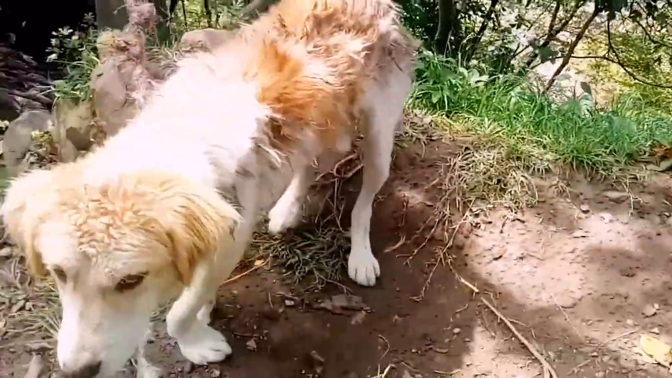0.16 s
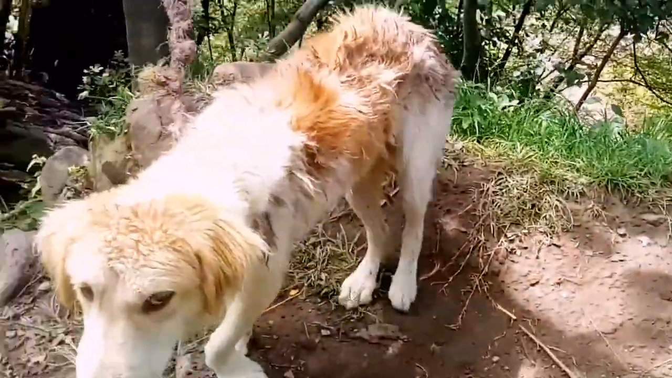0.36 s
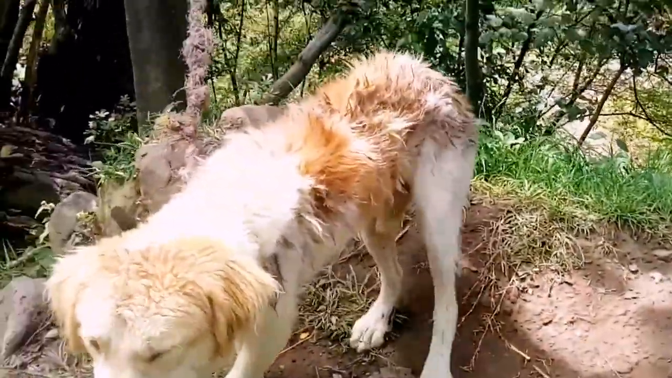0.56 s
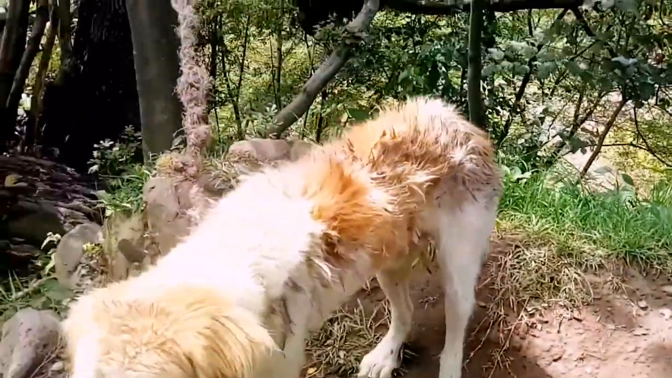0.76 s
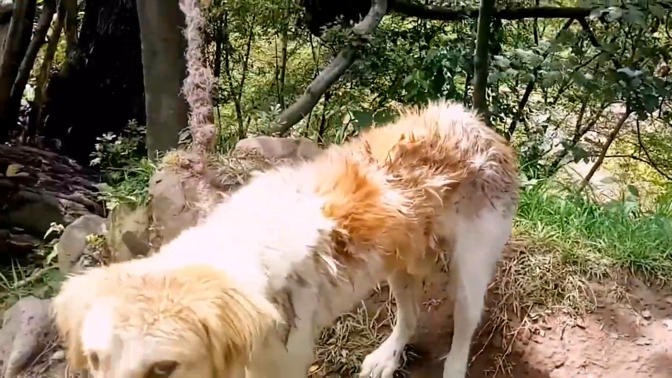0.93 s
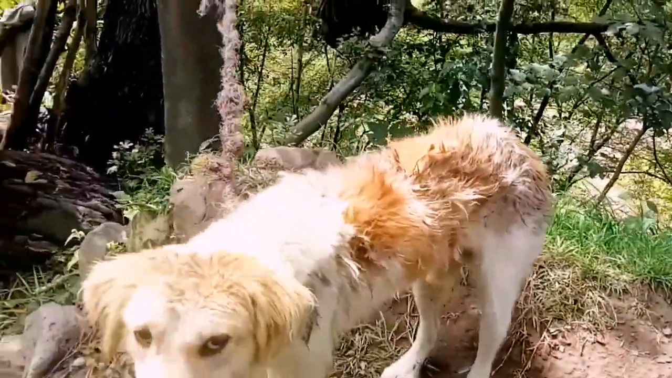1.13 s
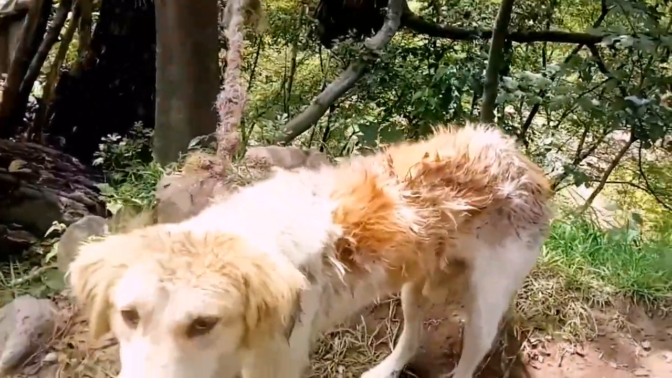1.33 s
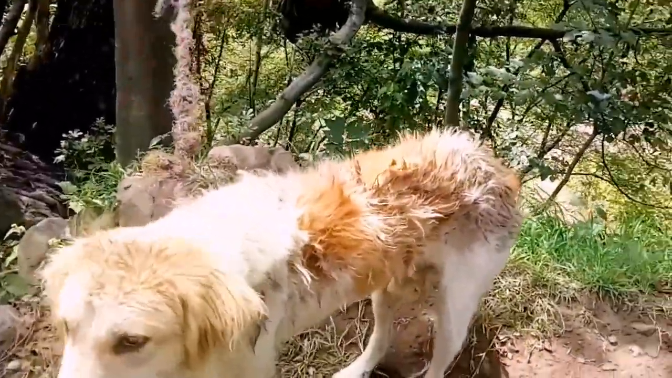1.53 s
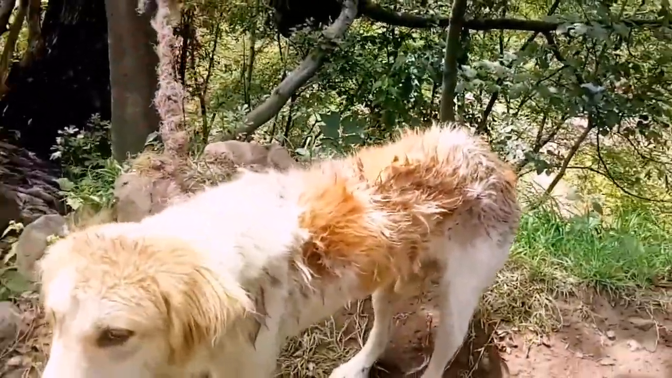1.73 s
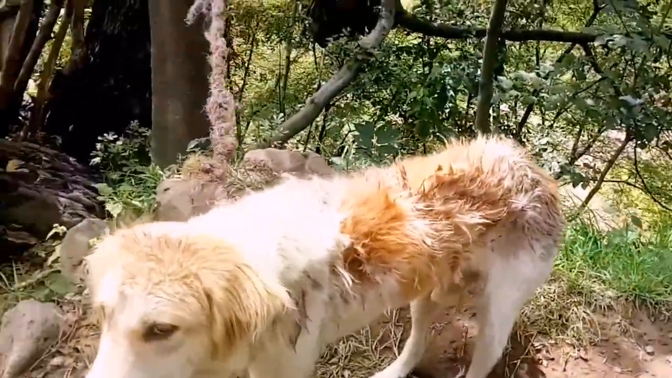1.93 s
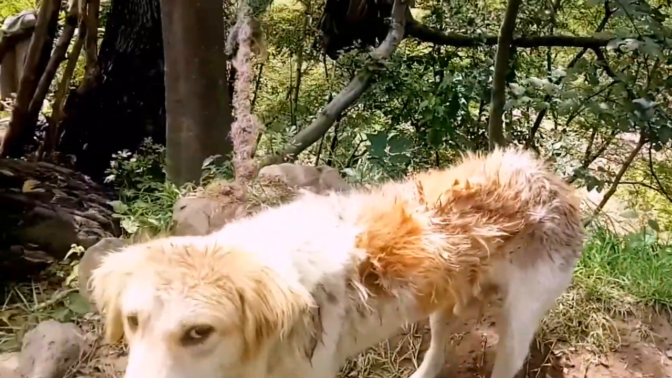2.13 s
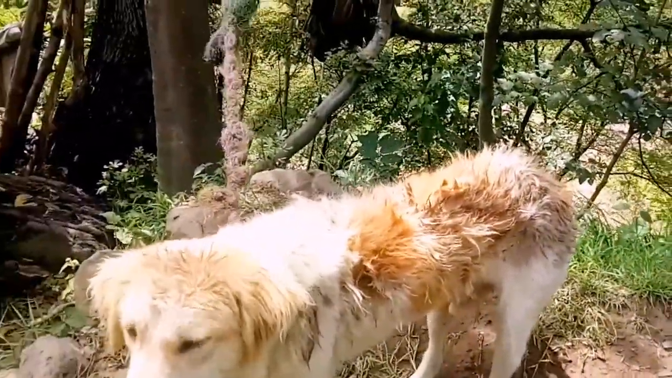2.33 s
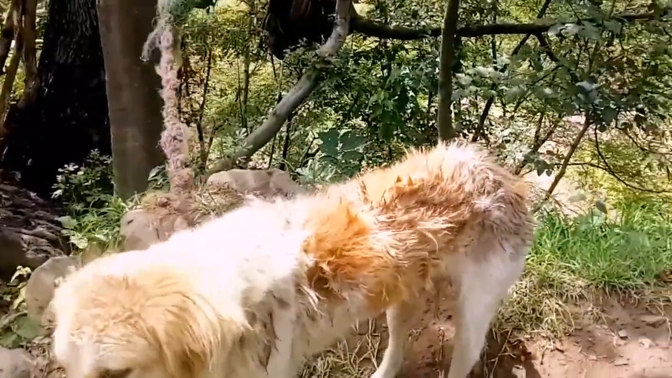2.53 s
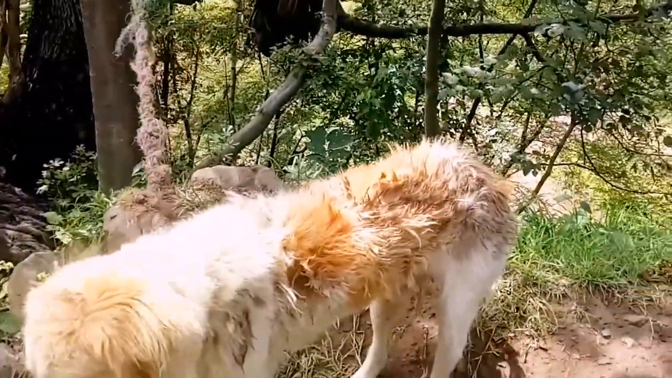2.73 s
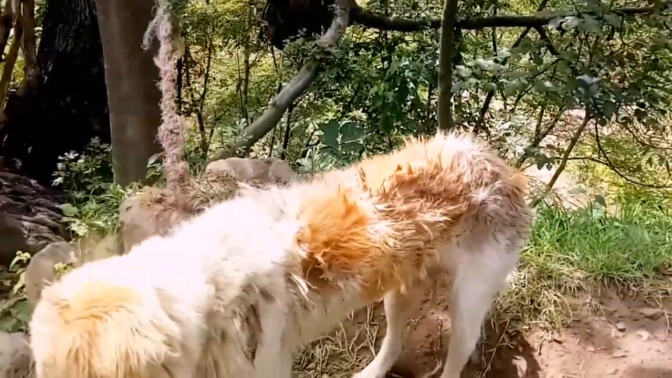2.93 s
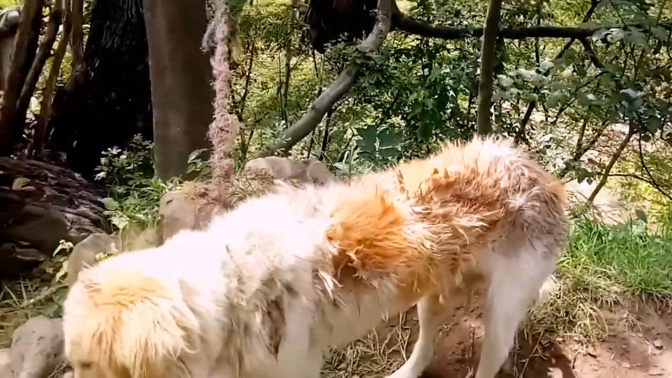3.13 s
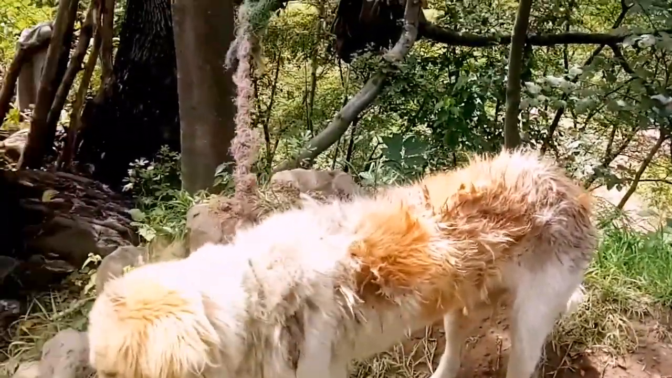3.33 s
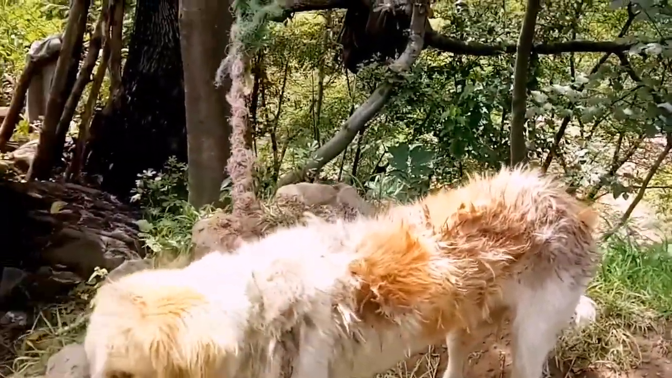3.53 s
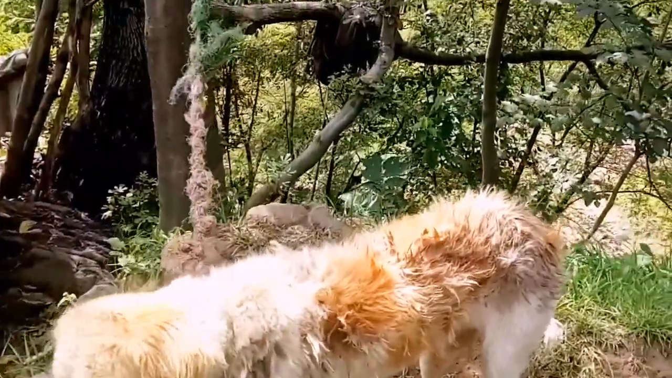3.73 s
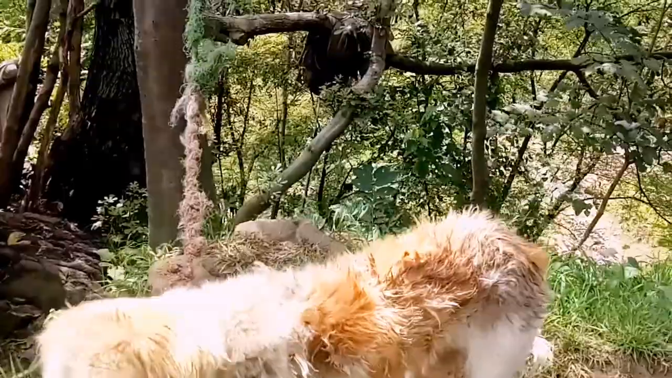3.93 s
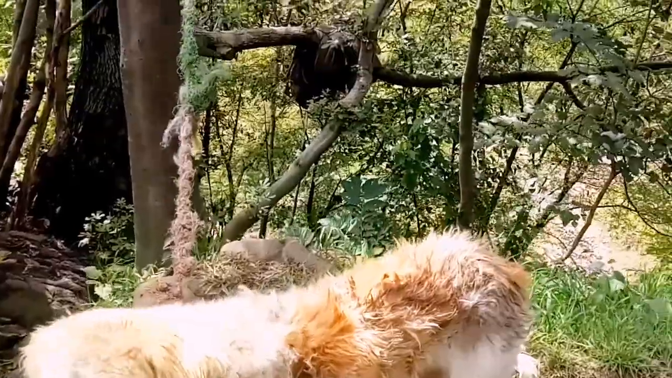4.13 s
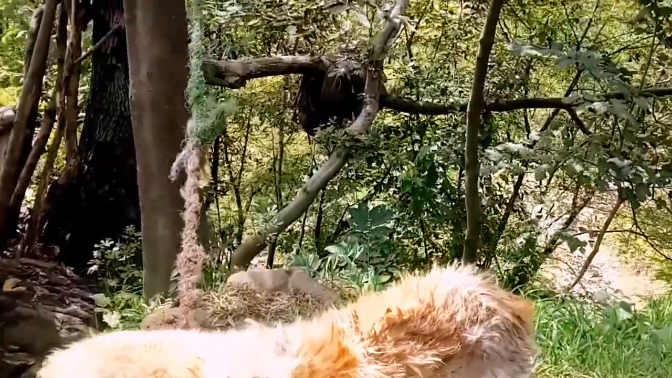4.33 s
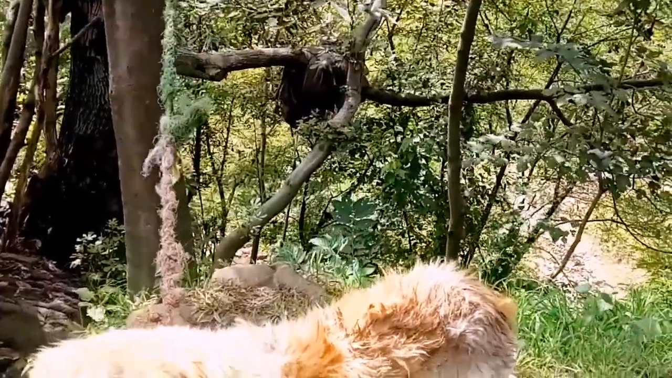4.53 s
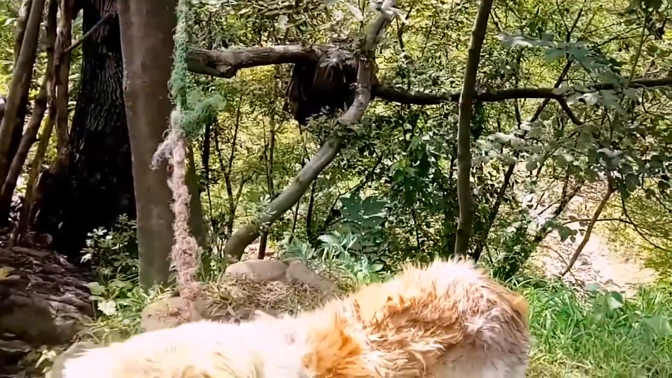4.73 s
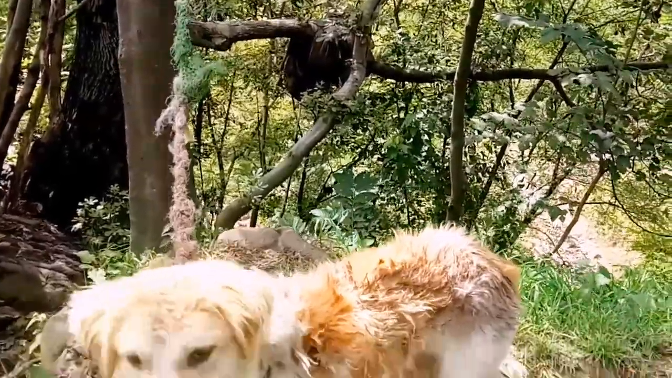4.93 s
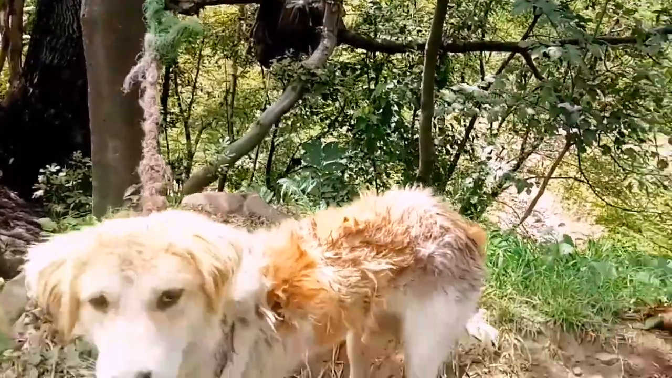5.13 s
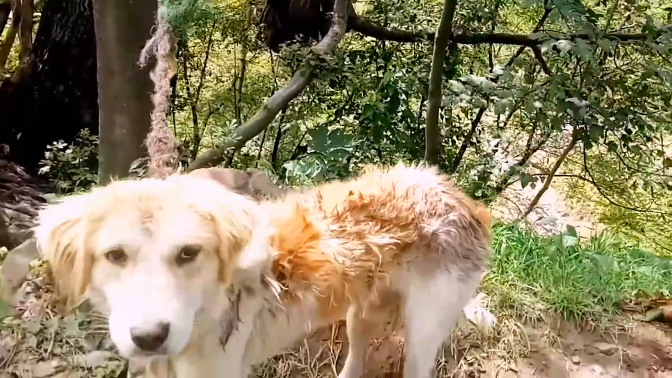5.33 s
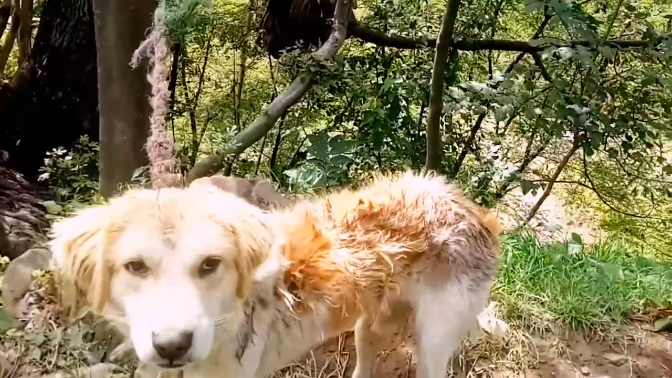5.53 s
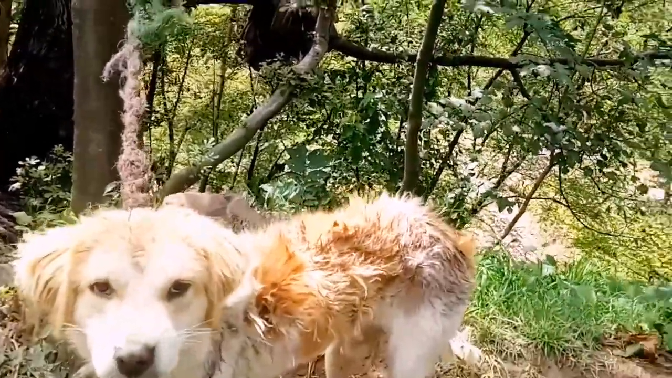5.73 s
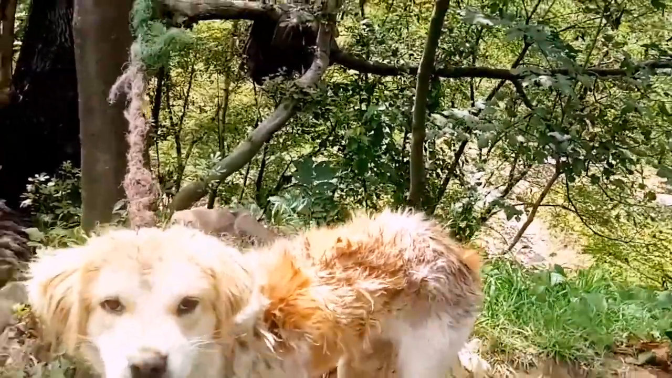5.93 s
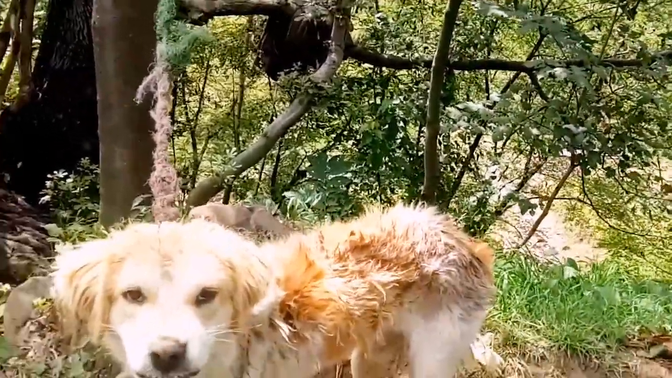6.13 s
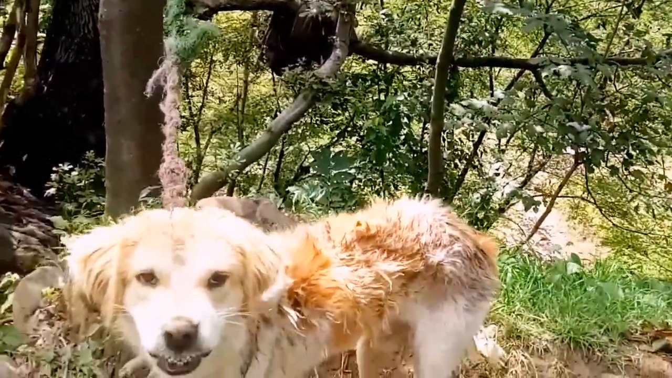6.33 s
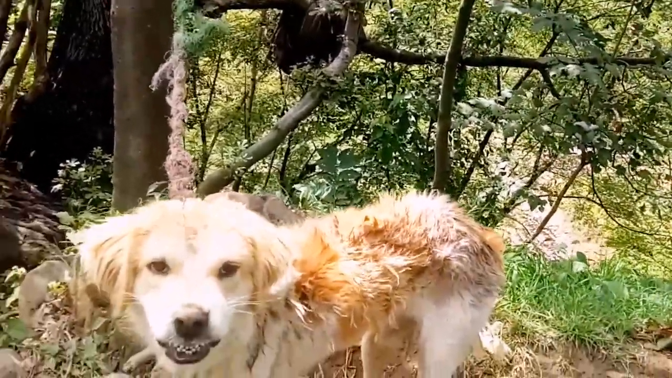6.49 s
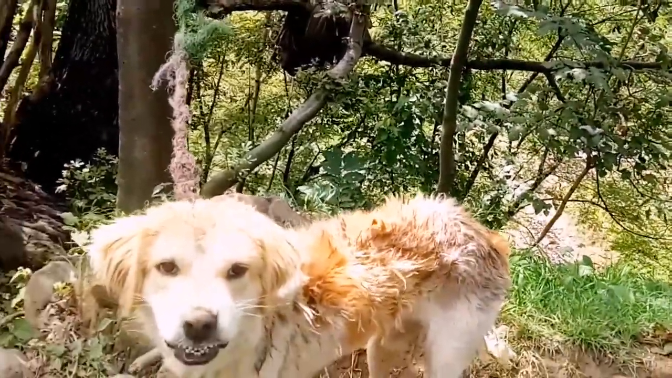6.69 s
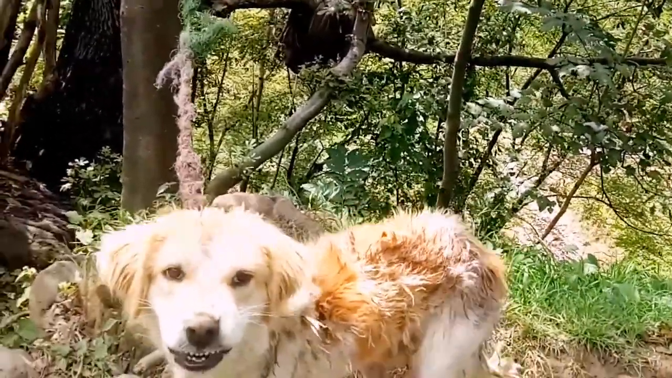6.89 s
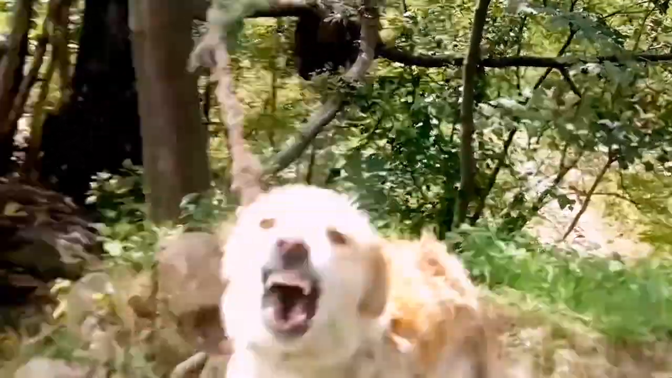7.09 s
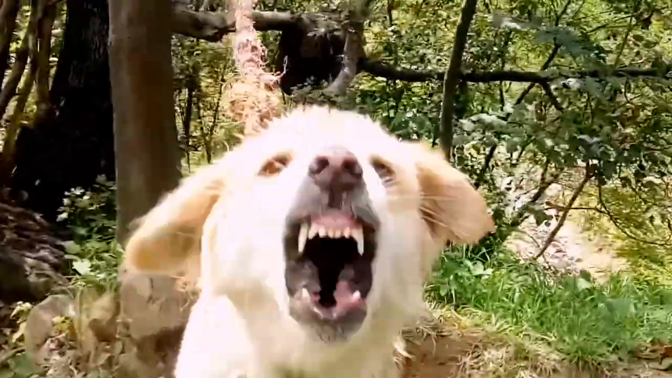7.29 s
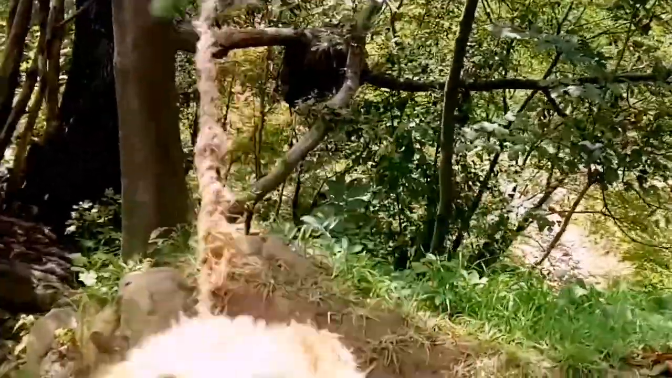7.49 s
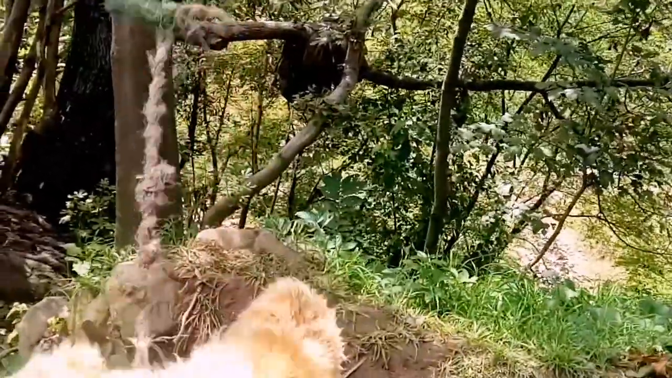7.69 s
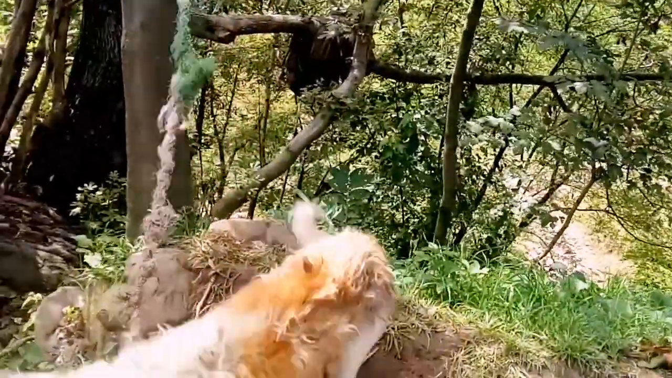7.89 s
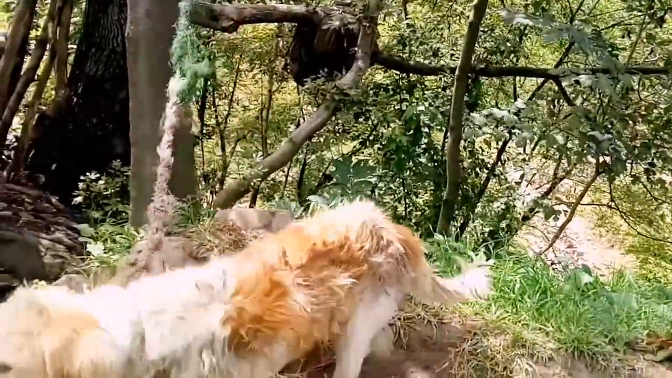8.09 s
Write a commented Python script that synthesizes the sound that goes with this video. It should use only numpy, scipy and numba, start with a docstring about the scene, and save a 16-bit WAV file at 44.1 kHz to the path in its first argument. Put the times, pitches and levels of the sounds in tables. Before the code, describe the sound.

Loud throbbing cicada hiss among trees, soft paw scuffs and thuds, then a close dog bursts into four snarling, overloaded barks near the end.

```python
"""A barking dog under cicadas

Among trees, with air and leaves all around, a loud chorus of cicadas throbs: bands of shaped noise.
A dog close to the microphone shifts its feet on bare earth: rushes of noise make scrapes, twigs and
low thuds, with a longer soft low murmur among them.
Then come four barks joined by snarls, hoarse or clear: harmonics and noisy slaps through a moving throat.
The barks make the gain control duck the cicadas and overload the microphone."""
import sys
import numpy as np
from scipy import signal
from scipy.fft import rfft, irfft, next_fast_len
from scipy.io import wavfile
from scipy.ndimage import uniform_filter1d
from numba import njit

SR = 44100
rng = np.random.default_rng(int(sys.argv[2]) if len(sys.argv) > 2 else 0)


def store_wav(level_fs):
    """Save 16-bit WAV to argv[1]."""
    pcm = np.round(np.clip(np.atleast_2d(level_fs), -1, 1) * 32767)
    wavfile.write(sys.argv[1], SR, pcm.T.astype(np.int16))


N = 359415


def from_db(db):
    """Decibels to gain."""
    return 10 ** (np.asarray(db) / 20)


def rms_one(x):
    """Scale to an rms of 1."""
    return x / np.sqrt(np.mean(x ** 2) + 1e-20)


def at_hz(rows, hz):
    """Each column of a spectrum table, read on a log-frequency axis."""
    points, *columns = np.transpose(rows)
    return np.array([np.interp(np.log(hz + 1e-3), np.log(points), c) for c in columns])


def in_time(rows, t):
    """Each column of a curve table at the times t."""
    times, *columns = np.transpose(rows)
    return [np.interp(t, np.sort(times), c) for c in columns]


def filtered(x, hz, kind, order=2):
    """Butterworth filter."""
    corner_hz = np.clip(hz, 10, .45 * SR)
    return signal.sosfilt(signal.butter(order, corner_hz, kind, fs=SR, output="sos"), x)


def drift(rate_hz, size):
    """Smooth random wander of spread 1: noise that loses everything much faster than rate_hz."""
    hz = np.fft.rfftfreq(size, 1 / SR)
    slow = rfft(rng.standard_normal(size)) / (1 + (hz / rate_hz) ** 2)
    return rms_one(irfft(slow, size))


def turning(hz):
    """Phase in radians of a tone whose frequency changes sample by sample."""
    return 2 * np.pi * np.cumsum(hz) / SR


def evened(x):
    """Hold the short-term level at 1."""
    return x / np.sqrt(np.abs(uniform_filter1d(x * x, size=500)) + 1e-12)


# How alike the left and right channels of the background are: (frequency [Hz], likeness [0-1])
CHANNEL_LIKENESS = [(100, 0), (300, 0.9), (1000, 0), (4500, 0), (5400, 0.44), (6000, 1), (7200, 0.73),
                    (9800, 0.2), (11000, .05)]


def ambient_noise(spectrum):
    """Background noise with a spectrum for each channel, partly shared between left and right."""
    size = next_fast_len(N)
    hz = np.fft.rfftfreq(size, 1 / SR)
    mid, side = rfft(rng.standard_normal((2, size)))
    alike = np.clip(at_hz(CHANNEL_LIKENESS, hz)[0], 0, 1)
    channels = np.sqrt(1 + alike) * mid + np.sqrt(1 - alike) * side * [[1], [-1]]
    shaped = irfft(channels * from_db(at_hz(spectrum, hz)), size)[:, :N]
    return shaped * np.sqrt(SR) / 2  # makes the table levels dB per Hz


# Air and leaves all around, before the murmur is lowered:
# (frequency [Hz], left level [dB per Hz], right level [dB per Hz])
AIR_SPECTRUM = [(25, -85, -88), (79.5, -86.5, -95), (171, -78.5, -87.5), (452, -83, -95), (850, -73, -84),
                (2480, -74.5, -85.5), (4000, -73, -79), (9000, -100, -105)]


def air_and_leaves(split_hz=520, leaves_waver_db=1.0, murmur_waver_db=7.0, murmur_db=-3):
    """One noise in two bands: leaves above, wavering slightly, and a low murmur that comes and goes."""
    air = ambient_noise(AIR_SPECTRUM)
    leaves = filtered(air, split_hz, "high", order=3) * from_db(leaves_waver_db * drift(12, N))
    murmur_gain = from_db(murmur_db + murmur_waver_db * drift(0.96, N))
    murmur = filtered(air, split_hz, "low", order=3) * murmur_gain
    return leaves + murmur


# The massed cicadas among the trees, before swell and throb:
# (frequency [Hz], left level [dB per Hz], right level [dB per Hz])
CHORUS_SPECTRUM = [(2600, -94.5, -89), (3270, -64.5, -78), (3640, -53.5, -62.5), (4023, -45, -64),
                   (4840, -44, -57), (5320, -49.5, -54), (5830, -54.5, -62), (6480, -69.5, -65.5),
                   (7930, -85, -82.5), (9920, -85.5, -86.5), (11460, -95, -100), (13500, -77, -96),
                   (14800, -77, -90), (15600, -78, -102)]
# One cicada nearer by, before its waver:
# (frequency [Hz], left level [dB per Hz], right level [dB per Hz])
SOLOIST_SPECTRUM = [(3260, -94, -93), (4340, -53, -53), (5100, -50.5, -59), (5670, -55.5, -55),
                    (7036, -68, -67.5), (8640, -100, -128)]


def cicadas(throb_hz=34, throb_depth=0.14, swell_db=1.03, tymbal_hz=432.6, buzz_depth=0.46, waver_db=1.3):
    """Many insects merge into a throbbing hiss; in the nearest the beat of the tymbals stands out."""
    throb = np.sin(turning(throb_hz * (1 + 0.083 * drift(4.1, N))))
    chorus = ambient_noise(CHORUS_SPECTRUM) * from_db(swell_db * drift(2.3, N))
    chorus *= 1 + throb_depth * throb * np.array([[1], [.5]])  # half as deep on the right
    beat = np.cos(turning(tymbal_hz * (1 + 0.0027 * drift(1.06, N))))
    buzz = rms_one(1 + buzz_depth * beat)
    soloist = ambient_noise(SOLOIST_SPECTRUM) * buzz * from_db(waver_db * drift(24, N))
    return chorus + soloist


def rush(start, length, hz, db):
    """A rush of noise around hz that peaks after a third of its length and dies away."""
    age = np.arange(SR) / SR / (length / 3)
    noise = rms_one(filtered(rng.standard_normal(SR), [hz / 1.53, hz * 1.335], "band"))
    swell = age * np.exp(1 - age)
    return np.pad(from_db(db) * noise * swell, (int(max(start, 0) * SR), N))[:N]


# Low thuds, and a longer soft low murmur:
# (time [s], length [s], centre [Hz], peak level on the left [dB])
LOW_THUDS = [(0.052, 0.072, 185, -35), (0.477, .21, 186, -44.5), (1.226, 0.1, 174, -41),
             (2.289, 0.085, 140, -37.5), (2.417, 0.24, 180, -42.5), (2.948, 0.47, 340, -47.5),
             (3.821, 0.11, 293, -40.5), (4.386, 0.076, 336, -37.5), (5.13, 0.094, 242, -41.5),
             (5.322, 0.41, 180, -45.5), (7.966, 0.043, 217, -29), (8.006, 0.13, 144, -37.5)]
# Paws scrape over grit: (time [s], length [s], centre [Hz], peak level on the left [dB])
GRIT_SCRAPES = [(.008, 0.13, 1330, -35.5), (3.852, .05, 2000, -37.5), (4.404, 0.16, 756, -34),
                (7.961, .08, 718, -33)]
GRIT_RATIO, GRIT_DB = 2.6, -7   # fine grains sound this much higher and weaker than the scrape
# Twigs snap underfoot: (time [s], peak level on the left [dB])
TWIG_SNAPS = [(3.79, -31), (3.833, -22), (3.869, -36)]
SNAP_S, SNAP_HZ = 0.0068, 2520


def thuds_and_scuffs(right_db=-7):
    """Rushes of noise: low thuds and a soft low murmur, paws scraping fine grit, and snapping twigs."""
    thuds = sum(rush(*row) for row in LOW_THUDS)
    scrapes = sum(rush(*row) for row in GRIT_SCRAPES)
    grit = sum(rush(start, length, hz * GRIT_RATIO, db + GRIT_DB) for start, length, hz, db in GRIT_SCRAPES)
    twigs = sum(rush(start, SNAP_S, SNAP_HZ, db) for start, db in TWIG_SNAPS)
    return (thuds + scrapes + grit + twigs) * from_db([[0], [right_db]])


# Echoes off trunks and banks, before the right port's loss:
# (delay [s], left level [dB], right level [dB])
TREE_ECHOES = [(.033, -32, -38), (.068, -44, -35), (.11, -42, -35.5)]


def woods(x, tail_db=-33, tail_t60_s=1.0, dull_hz=1800):
    """A few dull echoes, and a thin tail scattered by the trees."""
    t = np.arange(SR) / SR
    scatter = rng.standard_normal((2, SR)) * from_db(-60 * t / tail_t60_s) * (t > .015)
    response = from_db(tail_db) * rms_one(scatter) / np.sqrt(SR)
    for delay, left_db, right_db in TREE_ECHOES:
        response[:, int(delay * SR)] += from_db([left_db, right_db])
    dull = filtered(x, dull_hz, "low")
    return signal.fftconvolve(dull[None], response, axes=1)[:, :N]


@njit
def two_pole(x, angle, r):
    """A resonance whose centre moves sample by sample; gain 1 on top."""
    y = np.zeros(len(x))
    for i in range(2, len(x)):
        y[i] = (1 - r * r) / 2 * (x[i] - x[i - 2]) + 2 * r * np.cos(angle[i]) * y[i - 1] - r * r * y[i - 2]
    return y


def resonance(x, hz, width_hz):
    """A throat resonance with steep skirts: the same two-pole resonance twice."""
    angle = 2 * np.pi * hz / SR * np.ones(len(x))
    r = np.exp(-np.pi * width_hz / SR)
    return two_pole(two_pole(x, angle, r), angle, r)


def throat(x, mouth, first_width_hz=270, second_width_hz=260, muzzle_hz=1680, muzzle_width_hz=330,
           chest_hz=230, chest_width_hz=180, top_hz=1800):
    """Two moving resonances, the muzzle, and a dull path through neck and chest; soft tissue takes the treble."""
    first_hz, second_hz, second_db, muzzle_db, chest_db = mouth
    out = resonance(x, first_hz, first_width_hz)
    out += from_db(second_db) * resonance(x, second_hz, second_width_hz)
    out += from_db(muzzle_db) * resonance(x, muzzle_hz, muzzle_width_hz)
    out += from_db(chest_db) * resonance(x, chest_hz, chest_width_hz)
    return filtered(out, top_hz, "low", order=6)


def envelope_db(t, start, length, attack_db_per_s, release_s):
    """A fast attack, a hold, and a release that falls ever faster: 20 dB down after release_s."""
    before = np.maximum(start - t, 0)
    after = np.maximum(t - start - length, 0)
    return -attack_db_per_s * before - 20 * (after / release_s) ** 2


# Snarls before, between and after the barks, level given at the middle of the glide:
# (time [s], length [s], pitch at start [Hz], at end [Hz], level [dB], roughness [0-1],
#  second throat resonance [Hz], its level [dB])
SNARL_CALLS = [(7.257, .03, 441.2, 581.2, 9.5, .93, 940, 4), (7.408, .026, 480.4, 289, 13, 0.95, 696, -17),
               (7.459, .069, 245.4, 315, 3.5, 0.6, 1250, -17.5),
               (7.625, .025, 599, 610, -8, 0.57, 1100, -9), (7.661, .028, 214.8, 256, -7, 0.63, 1130, -5),
               (7.699, .014, 278.4, 329.5, 5.5, 0.47, 1078, -17), (7.727, .042, 445, 455, 7, 0.48, 866, -6),
               (7.855, 0.014, 577, 554.5, -1, 0.29, 1190, -13.5),
               (7.882, 0.051, 178, 165, -21, 0.23, 700, -22)]
SNARL_ATTACK_DB_PER_S, SNARL_RELEASE_S = 3200, .014
EFFORT_DB_PER_OCTAVE = 14   # a snarl grows louder as its pitch climbs


def snarl(t, start, length, start_hz, end_hz, db, rough, second_hz, second_db):
    """Pitch glides in a straight line and the level follows it."""
    pitch = np.interp(t, [start, start + length], [start_hz, end_hz])
    effort_db = EFFORT_DB_PER_OCTAVE * np.log2(pitch / np.sqrt(start_hz * end_hz))
    level_db = db + effort_db + envelope_db(t, start, length, SNARL_ATTACK_DB_PER_S, SNARL_RELEASE_S)
    return np.broadcast_arrays(level_db, pitch, rough, second_hz, second_db)


# The four barks, pitch before the crack is added, level in the middle of the bark:
# (time [s], length [s], release [s], pitch at start [Hz], at middle [Hz], at end [Hz], level [dB],
#  roughness at start [0-1], at end [0-1], second throat resonance [Hz], its level [dB])
BARK_CALLS = [(7.058, 0.1, .032, 601.3, 649, 593.2, 17, 0.75, 0.84, 805, -13),
              (7.292, .106, .02, 575.5, 602.2, 514.6, 28, 0.53, 0.17, 1060, -13.5),
              (7.548, .052, .028, 504.7, 542.4, 573.3, 17, 0.67, 0.66, 1420, -3),
              (7.772, 0.063, 0.015, 497.7, 527.7, 485, 17, 0.09, 0, 1068, -11)]
BARK_ATTACK_DB_PER_S = 1900
BARK_ARCH_DB = 2.0   # a bark is this much weaker at its ends than in its middle
UNLOCK_S, UNLOCKED_ROUGHNESS = .012, 0.936   # outside a bark's hold the folds fall out of step
CRACK_AT_S, CRACK_LENGTH_S, CRACK_HZ = 7.358, .013, 31.9   # the loudest bark cracks briefly upward


def bark(t, start, length, release_s, start_hz, middle_hz, end_hz, db, start_rough, end_rough,
         second_hz, second_db):
    """Pitch and level bend in one arch; the voice is hoarse on the way in and out."""
    along = np.clip((t - start) / length, 0, 1)
    arch = 4 * along * (1 - along)
    pitch = start_hz + (end_hz - start_hz) * along + (middle_hz - (start_hz + end_hz) / 2) * arch
    pitch += CRACK_HZ * np.exp(-((t - CRACK_AT_S) / CRACK_LENGTH_S) ** 2)
    level_db = db - BARK_ARCH_DB * (1 - arch)
    level_db = level_db + envelope_db(t, start, length, BARK_ATTACK_DB_PER_S, release_s)
    rough = np.interp(t, [start - UNLOCK_S, start, start + length, start + length + UNLOCK_S],
                      [UNLOCKED_ROUGHNESS, start_rough, end_rough, UNLOCKED_ROUGHNESS])
    return np.broadcast_arrays(level_db, pitch, rough, second_hz, second_db)


def voice_controls(t):
    """One throat makes all the calls: they run into each other, and the strongest leads."""
    barks = [bark(t, *row) for row in BARK_CALLS]
    snarls = [snarl(t, *row) for row in SNARL_CALLS]
    calls = np.array(barks + snarls)
    level_db = calls[:, 0].max(axis=0)
    lead = from_db(calls[:, :1] - level_db)
    blended = (lead * calls[:, 1:]).sum(axis=0) / lead.sum(axis=0)
    return level_db, *blended


def clear_folds(pitch, rough, mouth, doubling=1.55, strain_hz=(400, 600), jitter=.05):
    """The vocal folds beat regularly: eight equal harmonics of a slightly unsteady pitch."""
    phase = turning(pitch * (1 + jitter * rough * drift(216, len(pitch))))
    # under strain strong and weak cycles alternate, which puts half lines between the harmonics
    strain = rough * np.interp(pitch, strain_hz, [0, 1])
    harmonics = sum(np.cos(k * phase) for k in range(1, 9))
    folds = harmonics * (1 + doubling * strain * np.cos(phase / 2))
    return evened(throat(folds, mouth))


def hoarse_folds(pitch, mouth, chaos=.15, breath=.6, slap_spread_db=5.1):
    """The folds break into uneven slaps with a puff of air on each; returns the voice and the puffs."""
    size = len(pitch)
    cycles = np.cumsum(pitch * (1 + chaos * drift(150, size))) / SR
    slaps = np.diff(np.floor(cycles), prepend=0) * from_db(slap_spread_db * rng.standard_normal(size))
    puffs = rng.standard_normal(size) * (1 + np.cos(2 * np.pi * cycles))
    return evened(throat(rms_one(slaps) + breath * rms_one(puffs), mouth)), puffs


# The jaws gape, narrow as the head drops and shut, until the voice comes mostly through the chest:
# (time [s], first throat resonance [Hz], muzzle resonance level [dB], chest resonance level [dB])
JAW_MOVES = [(7.05, 583, -11, -18), (7.17, 667, -11, -23), (7.26, 595, -27, -16), (7.32, 613, -2, -18),
             (7.41, 567, -12, -19), (7.46, 522, -34, -13), (7.62, 570, -33, -16), (7.86, 515, -24, -15.5),
             (7.89, 500, -40, 2.5)]


def dog(flutter_db=2.0, flutter_hz=75, rasp_db=-23):
    """Roughness blends clear and hoarse vocal folds; breath rasps over the teeth and loose tissue flaps."""
    start = int((BARK_CALLS[0][0] - .06) * SR)
    t = np.arange(start, N) / SR
    level_db, pitch, rough, second_hz, second_db = voice_controls(t)
    first_hz, muzzle_db, chest_db = in_time(JAW_MOVES, t)
    mouth = first_hz, second_hz, second_db, muzzle_db, chest_db
    rough = np.clip(rough, 0, 1)
    clear = clear_folds(pitch, rough, mouth)
    hoarse, puffs = hoarse_folds(pitch, mouth)
    voice = evened(np.sqrt(1 - rough ** 2) * clear + rough * hoarse)
    # air rasps over the teeth, loudest when the jaws are wide open
    rasp = rms_one(filtered(puffs, [3000, 11000], "band"))
    voice += from_db(rasp_db + muzzle_db - muzzle_db.max()) * rasp
    # loose tissue flaps, the more so the rougher the voice
    flap = np.sin(turning(flutter_hz * (1 + 0.26 * drift(29, len(t)))))
    voice *= from_db(level_db + flutter_db * rough * flap)
    return np.pad(voice, (start, 0))


def two_ports(x, right_db=-7.5, shadow_db=-4.5, shadow_hz=1100, lead_s=.0001):
    """The right port gets the dog a moment sooner, but weaker and with its treble shaded."""
    size = next_fast_len(N + 1000)
    hz = np.fft.rfftfreq(size, 1 / SR)
    gain = from_db(right_db + shadow_db * hz ** 4 / (hz ** 4 + shadow_hz ** 4))
    sooner = np.exp(2j * np.pi * hz * lead_s)
    right = irfft(rfft(x[1], size) * gain * sooner, size)[:N]
    return np.array([x[0], right])


def scene():
    """The dog is close and louder on the left; insects and leaves lie all around."""
    surroundings = air_and_leaves() + cicadas()
    ground = thuds_and_scuffs()
    voice = dog()
    calls = two_ports(voice + woods(voice))
    return surroundings + ground + calls


def gain_control(x, threshold_db=-22, slope=0.39, excess_fall_db_per_s=330, sense_hz=1800, attack_hz=70,
                 ahead_s=0.0027):
    """Loud low and middle tones on the left turn both sides down; the gain comes back quickly."""
    t = np.arange(N) / SR
    power = np.abs(uniform_filter1d(filtered(x[0], sense_hz, "low", order=4) ** 2, size=600))
    over_db = np.maximum(10 * np.log10(power + 1e-12) - threshold_db, 0)
    # the excess rises at once and falls at a steady rate
    fall = excess_fall_db_per_s * t
    held_db = np.maximum.accumulate(over_db + fall) - fall
    # the smoothed excess is read a little ahead, so the gain drops earlier
    excess_db = np.interp(t + ahead_s, t, filtered(held_db, attack_hz, "low", order=1))
    return x * from_db(-slope * excess_db)


def record(dry, hardness=41.0, ceiling=.98, cutoff_hz=15700):
    """The microphone's gain control, overload that flattens the peaks, and a steep top cut."""
    x = gain_control(dry)
    clipped = x / (1 + np.abs(x / ceiling) ** hardness) ** (1 / hardness)
    return signal.sosfilt(signal.ellip(10, .1, 70, cutoff_hz, fs=SR, output="sos"), clipped)


dry = scene()
out = record(dry)
store_wav(out)
```